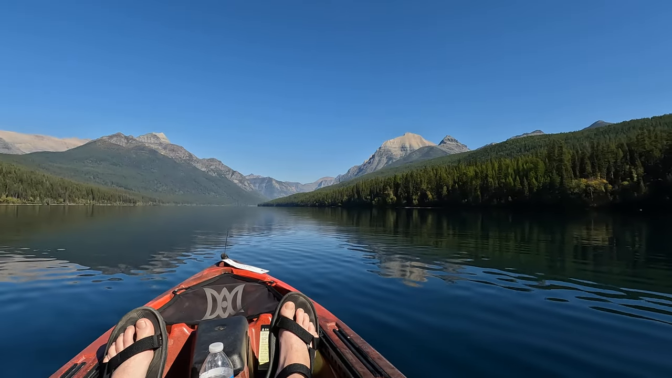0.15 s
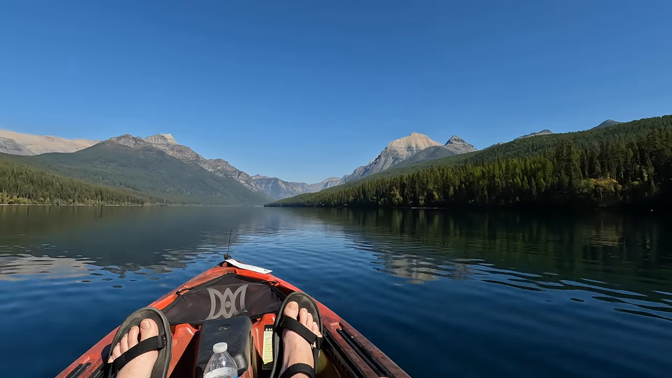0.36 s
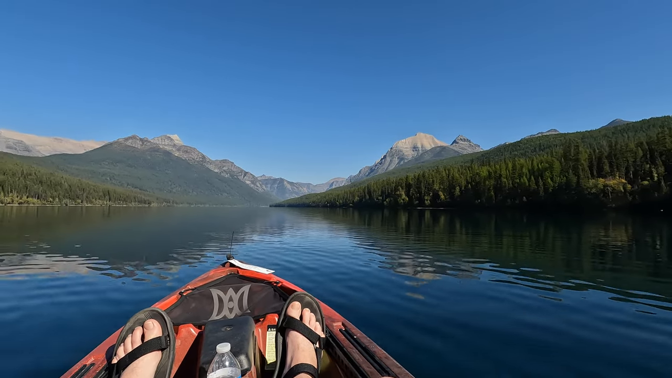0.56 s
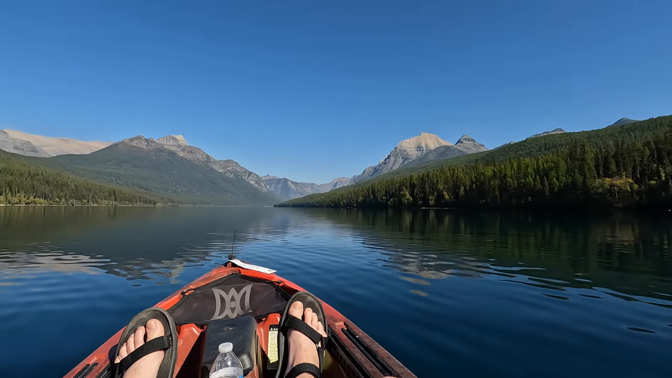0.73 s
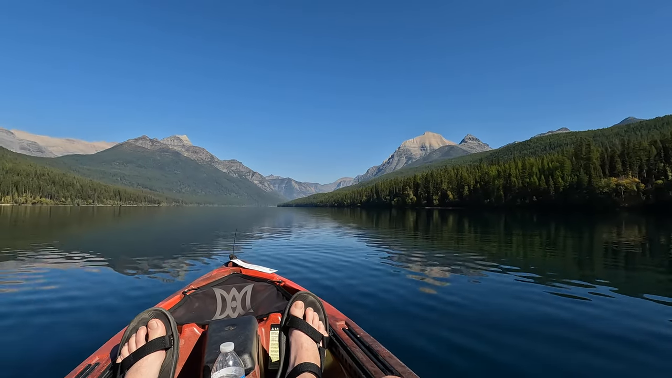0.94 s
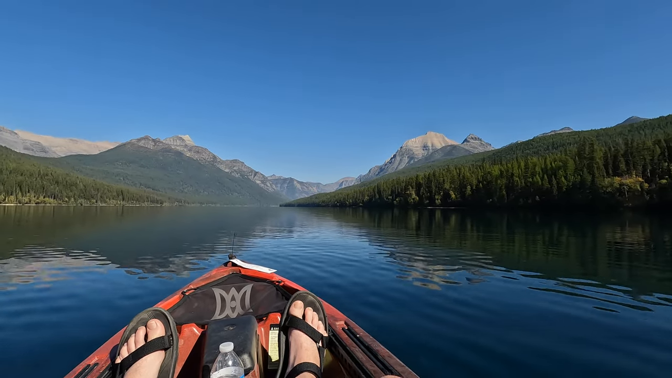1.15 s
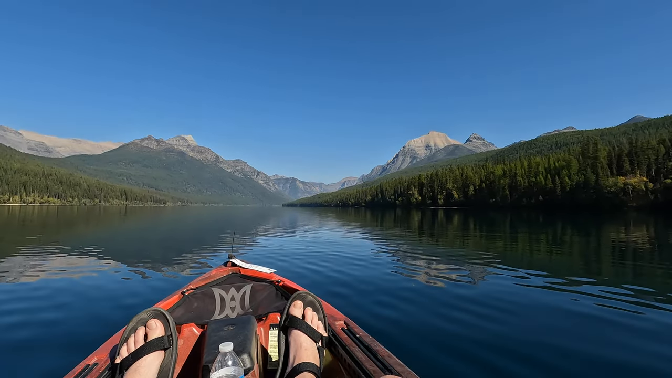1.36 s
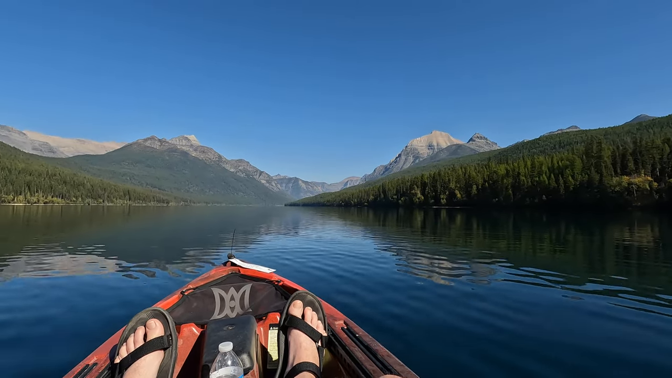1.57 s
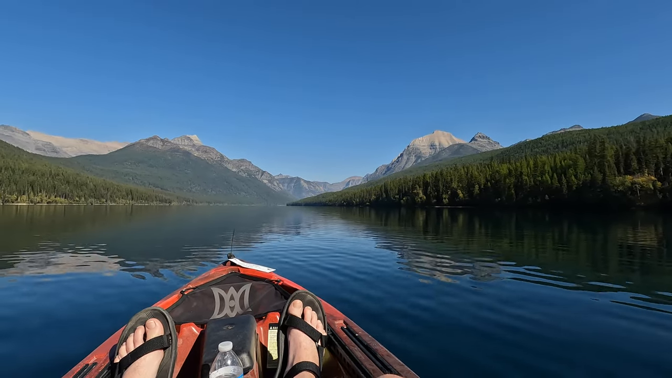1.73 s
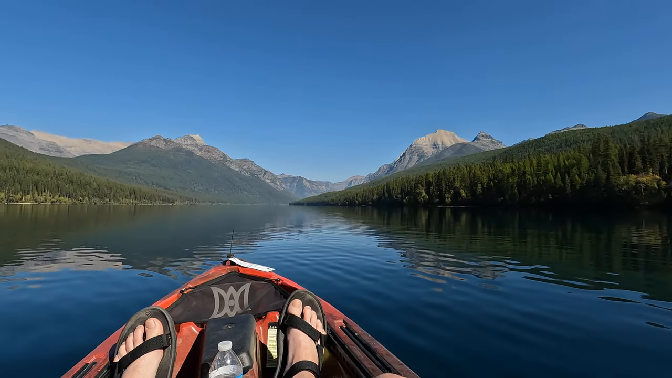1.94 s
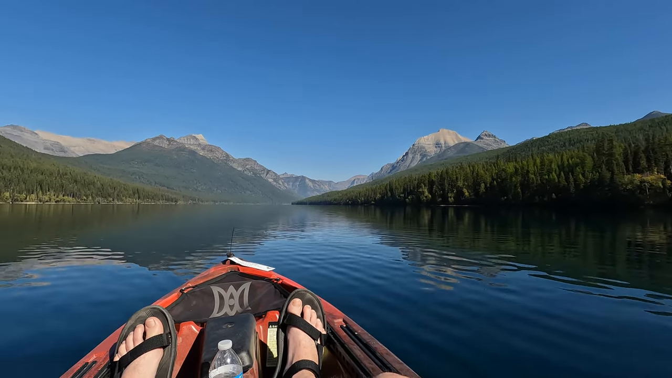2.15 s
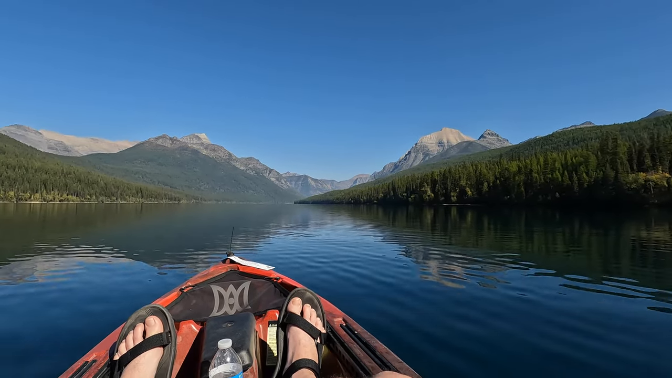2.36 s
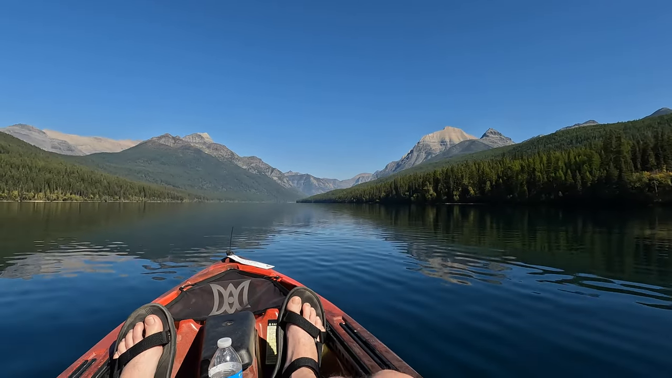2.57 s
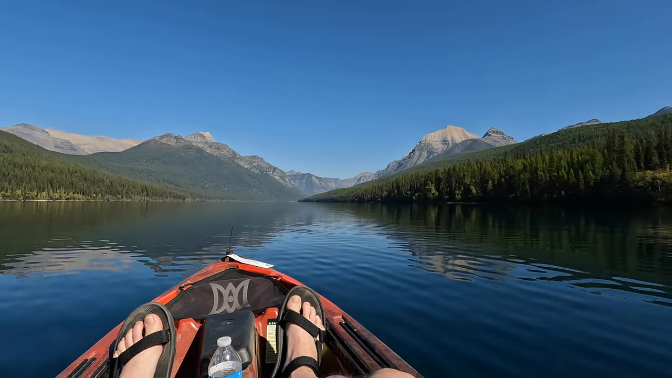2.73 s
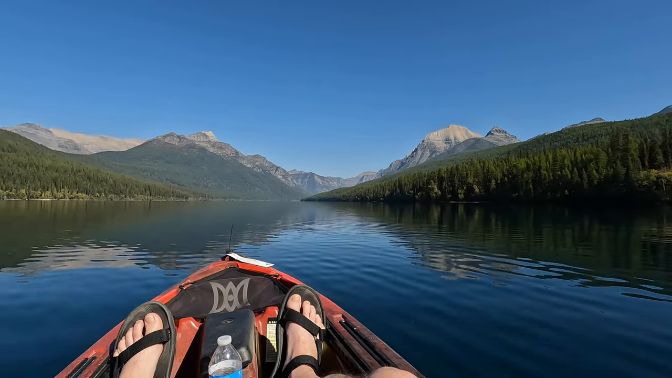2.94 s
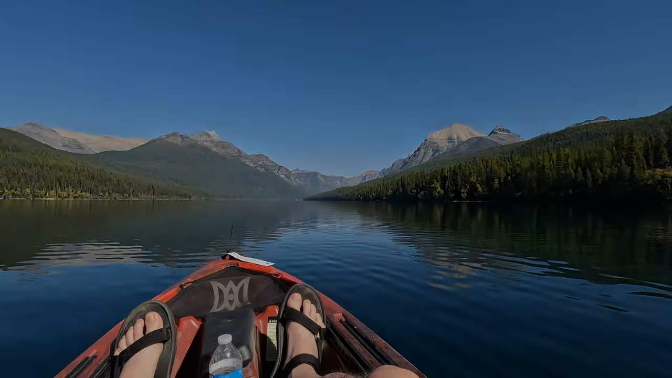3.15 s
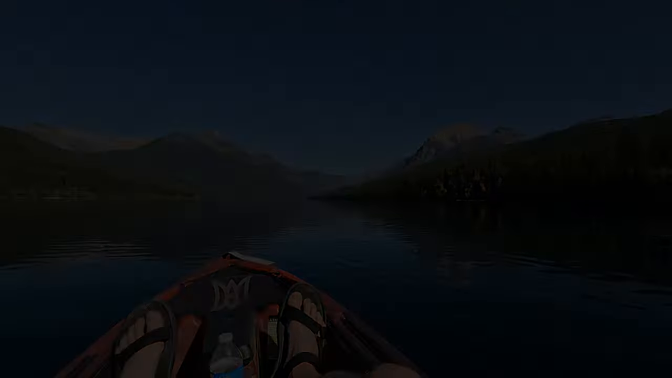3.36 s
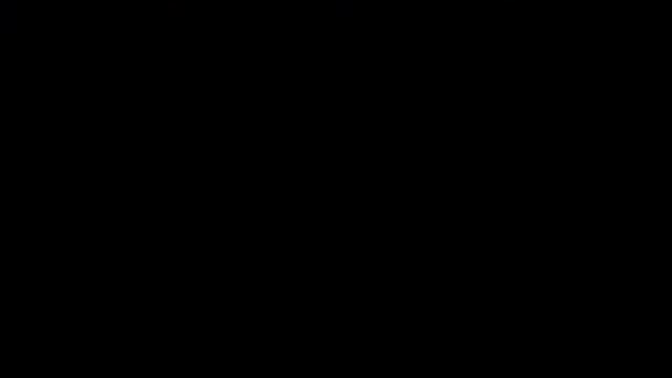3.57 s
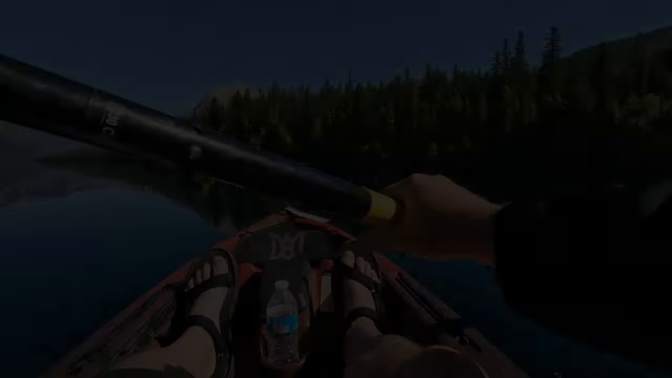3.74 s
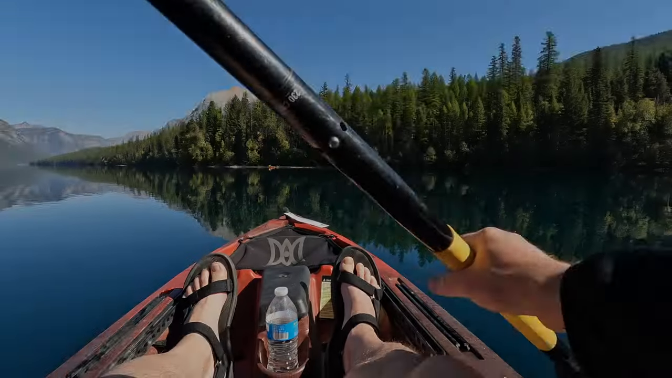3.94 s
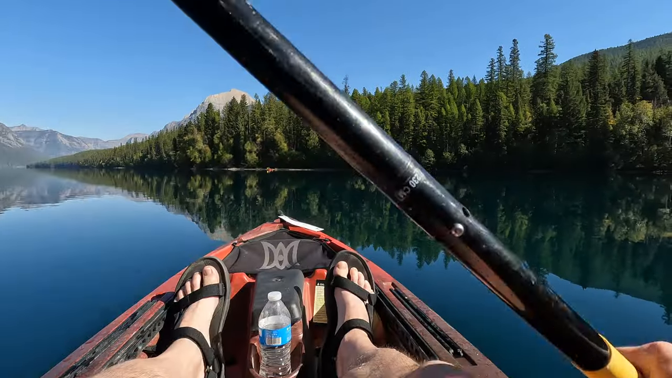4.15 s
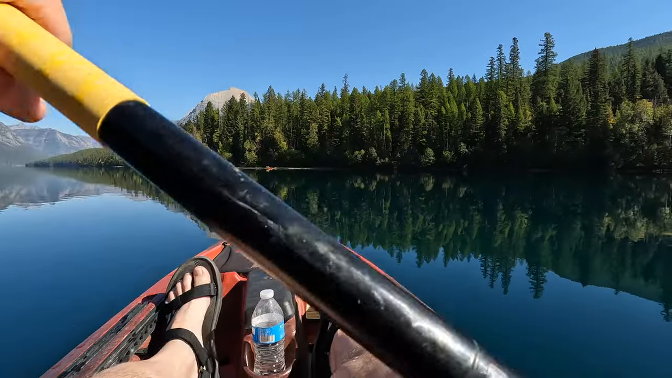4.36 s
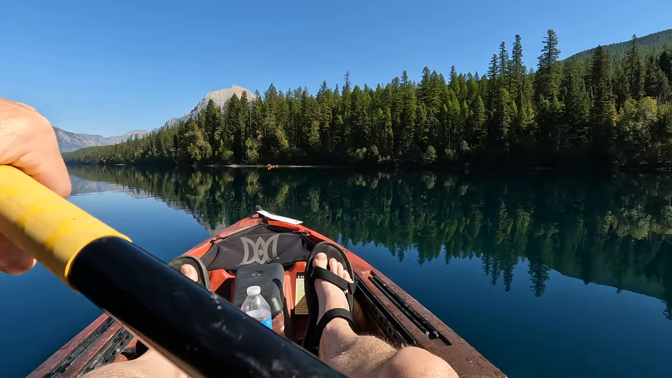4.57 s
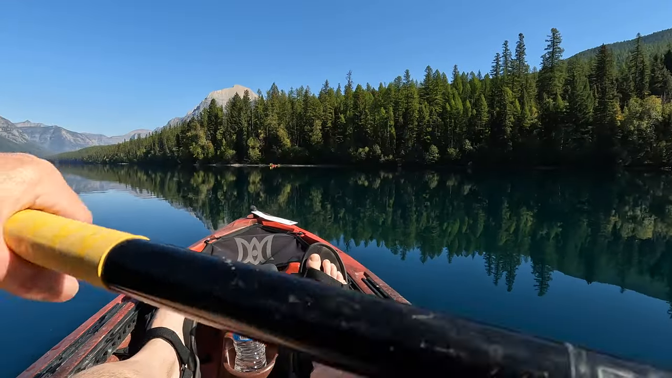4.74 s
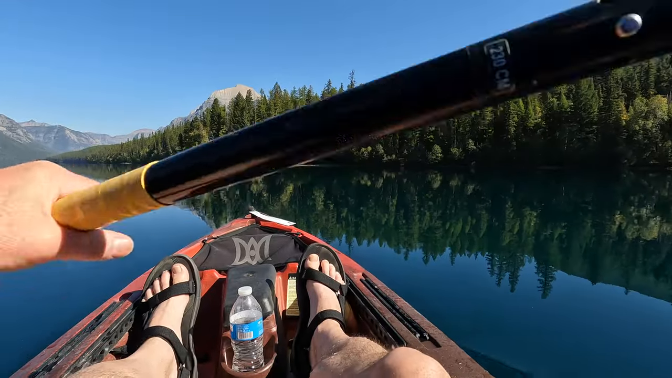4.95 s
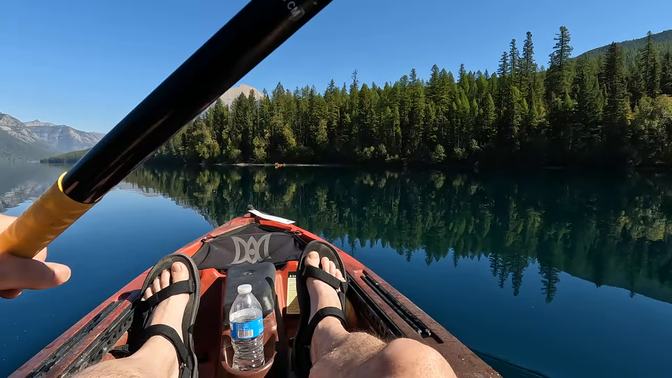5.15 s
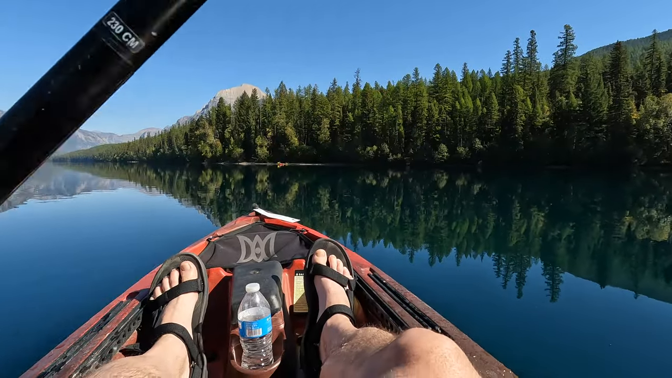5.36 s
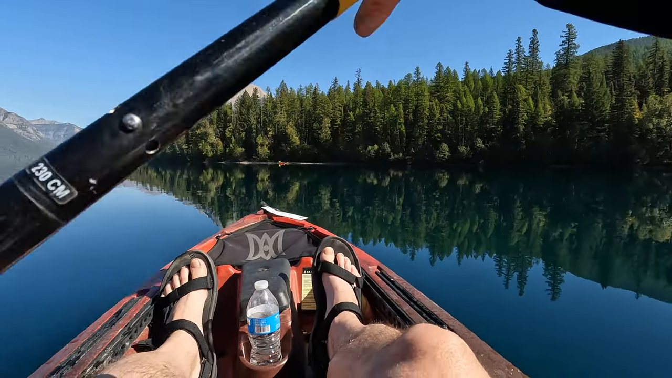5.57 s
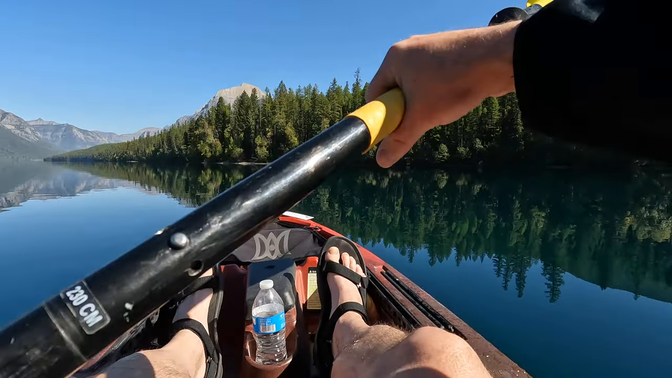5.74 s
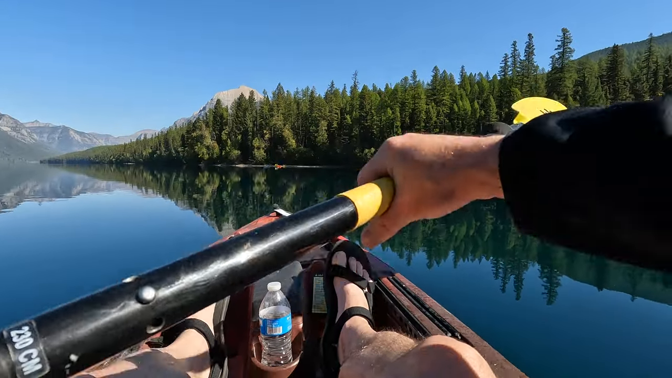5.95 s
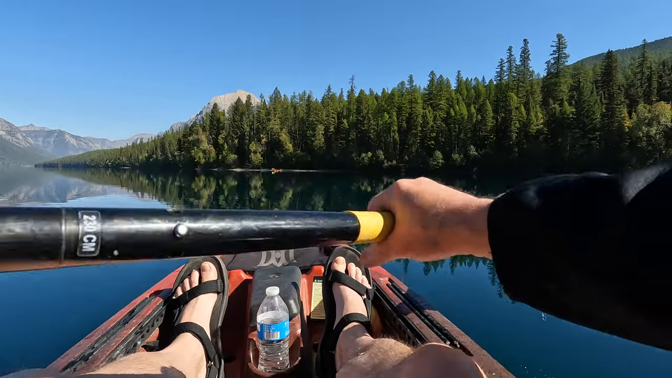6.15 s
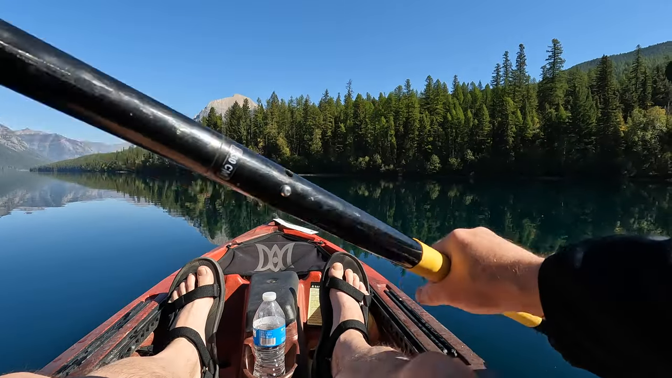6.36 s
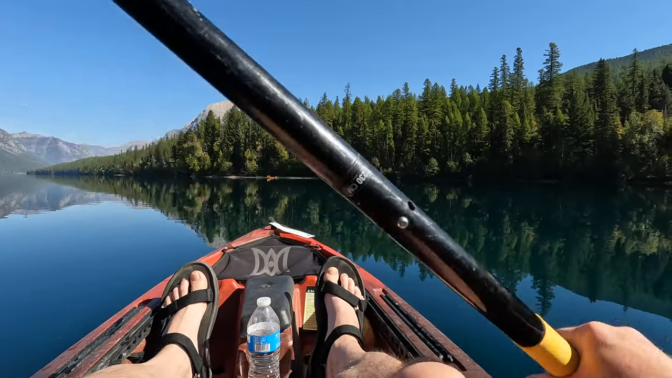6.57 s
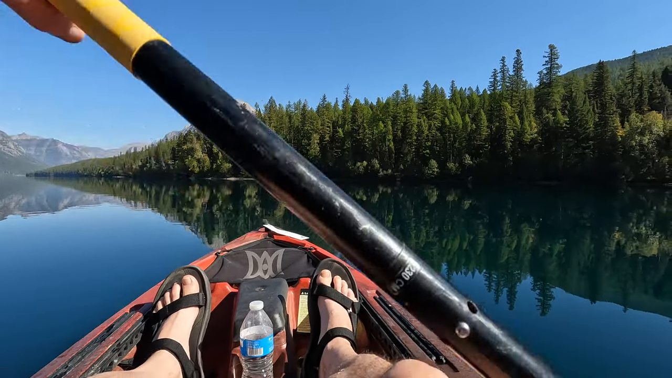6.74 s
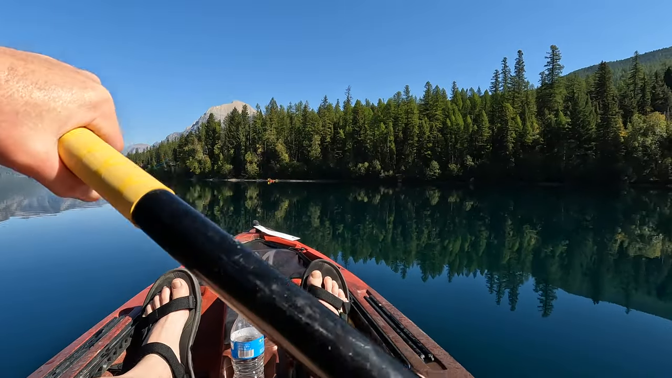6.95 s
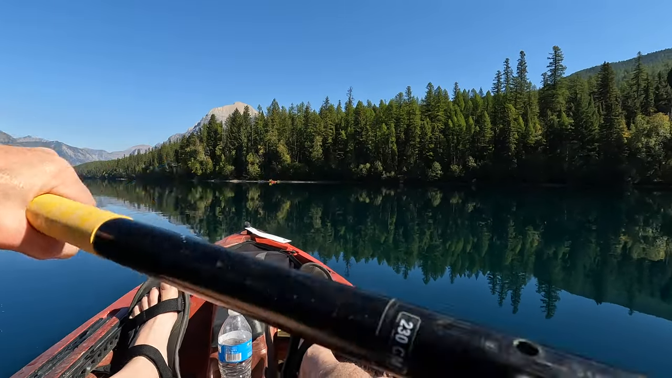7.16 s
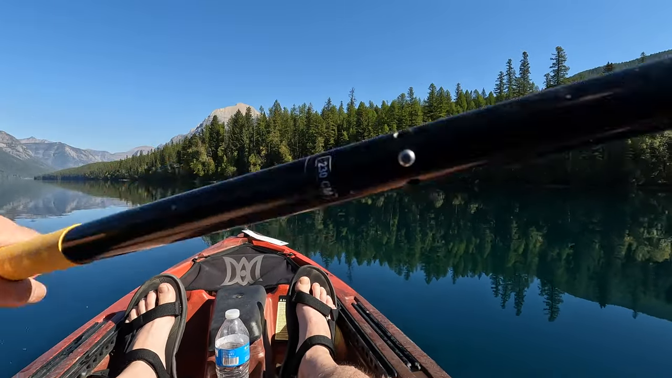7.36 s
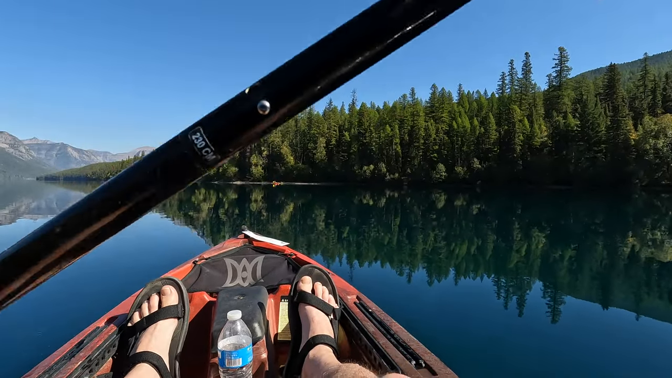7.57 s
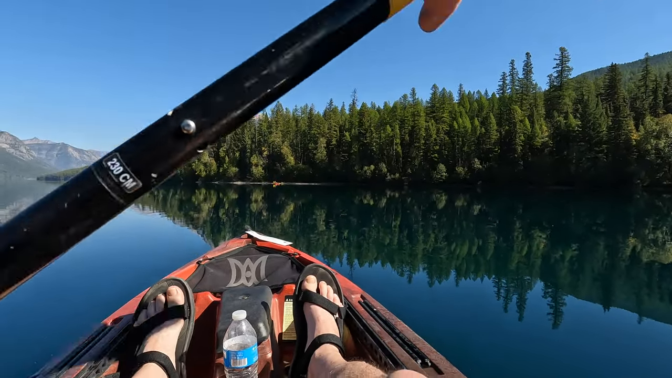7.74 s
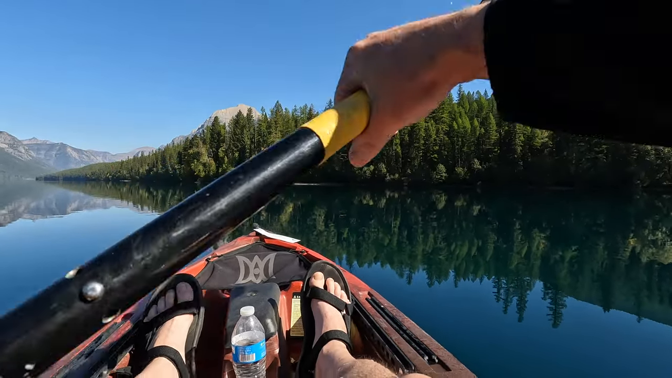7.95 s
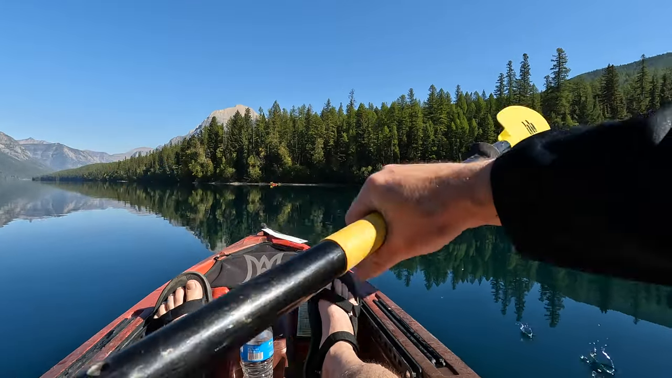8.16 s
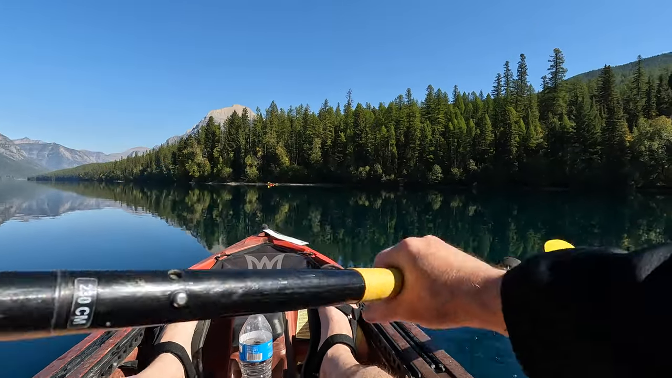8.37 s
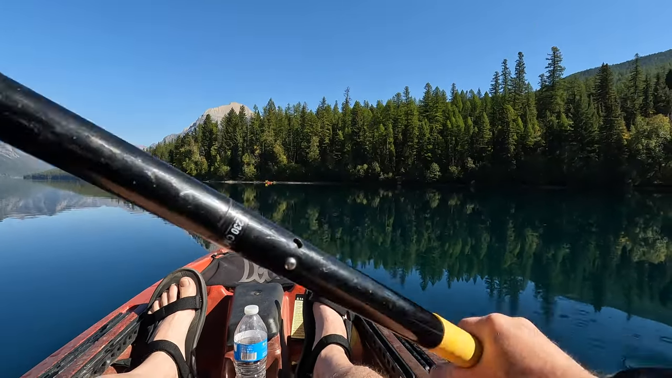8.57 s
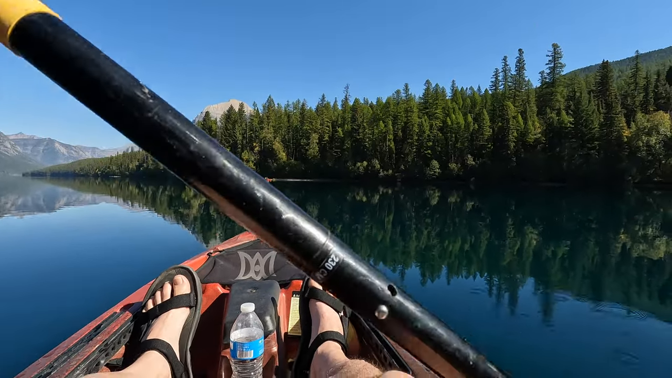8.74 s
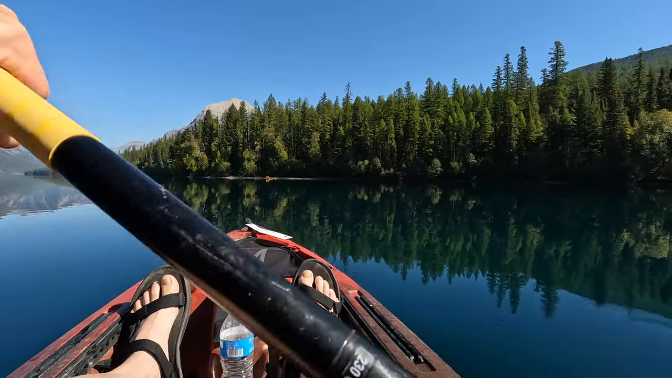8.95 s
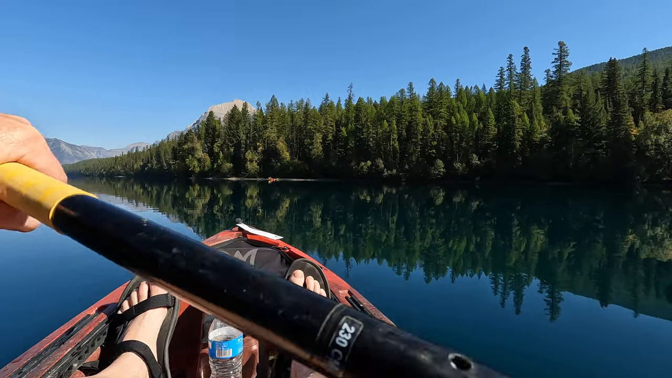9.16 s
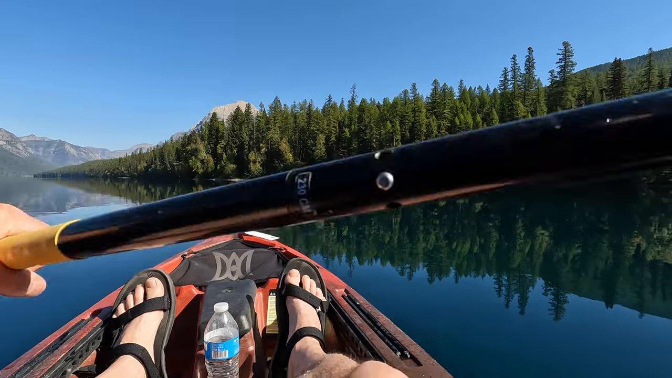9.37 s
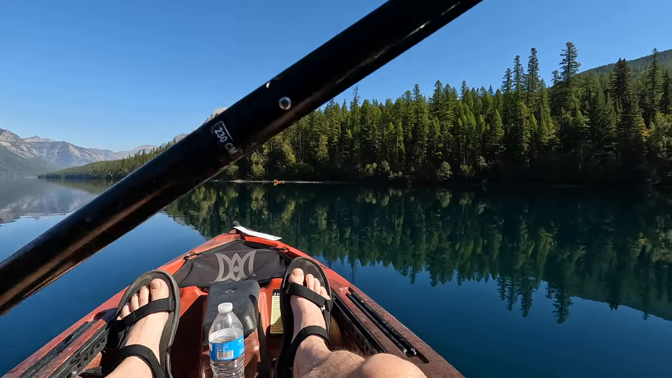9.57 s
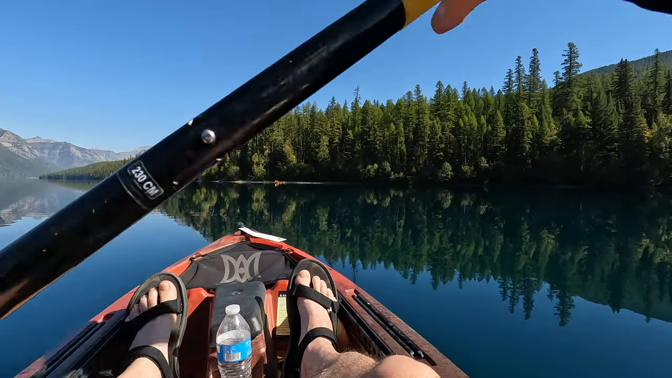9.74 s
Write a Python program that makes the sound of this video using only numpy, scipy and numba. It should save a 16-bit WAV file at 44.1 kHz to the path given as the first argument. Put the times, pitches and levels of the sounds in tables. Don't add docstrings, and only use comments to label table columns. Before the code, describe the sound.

Soft cloth rubbing and tiny creaks over a calm lake give way to rhythmic paddle strokes, deep bubbly gurgles, hull burble and spattering water.

```python
import sys
import numpy as np
from scipy import signal
from scipy.fft import rfft, irfft, next_fast_len
from scipy.io import wavfile
from scipy.ndimage import uniform_filter1d
from numba import njit

SR = 44100
rng = np.random.default_rng(int(sys.argv[2]) if len(sys.argv) > 2 else 0)


def transcribe(signal):
    frames = np.atleast_2d(signal).T
    limited = np.clip(frames, -1, 1)
    pcm = np.round(limited * 32767).astype(np.int16)
    wavfile.write(sys.argv[1], SR, pcm)


def how_loud(loudness_db):
    steps = np.asarray(loudness_db, float) / 20
    return 10 ** steps


N = 432621


def curve(table):
    s, db = np.transpose(table)
    return np.interp(np.arange(N) / SR, s, db, -120, -120)


def unit(x):
    return x / np.sqrt(np.mean(x ** 2))


def coloured(x, points):
    size = next_fast_len(N)
    hz = np.arange(size // 2 + 1) * SR / size + 1
    hz_at, db = np.transpose(points)
    gain = how_loud(np.interp(np.log(hz), np.log(hz_at), db))
    return unit(irfft(rfft(x, size) * gain, size)[:N])


def band(x, lo_hz, hi_hz):
    sos = signal.butter(2, [lo_hz, min(hi_hz, .45 * SR)], "band", fs=SR, output="sos")
    return unit(signal.sosfilt(sos, x))


def walk(rate):
    k = int(SR / rate)
    steps = np.repeat(rng.standard_normal(N // k + 1), k)
    return 1.25 * uniform_filter1d(uniform_filter1d(steps, k), k)[:N]


def swells(s, hold_s, rise_s, fall_s):
    t = np.arange(N) / SR
    return np.array([np.interp(t, [a - rise_s, a, a + h, a + h + fall_s], [0, 1, 1, 0])
                     for a, h in zip(s, hold_s)])


@njit
def ring(s, size, hz, cycles, glide, rise):
    out = np.zeros(N)
    for k in range(len(s)):
        start, tau, phase = int(s[k] * SR), cycles[k] * SR / hz[k] / 2, 0.
        for i in range(min(int(5 * tau), N - start)):
            u = i / tau
            phase += 2 * np.pi * hz[k] * (1 + glide[k] * u) / SR
            swell = (1 - np.exp(-u / rise)) * np.exp(-u * (1 + u) / 2)
            out[start + i] += size[k] * swell * np.sin(phase)
    return out


def swarm(count, lo_hz, hi_hz, cycles, glide, spread_db, pitch=np.ones(N)):
    when, big, high, long, climb = rng.random((count, 5)).T
    size = how_loud(np.minimum(-spread_db * np.log(1 - big), 14))
    hz = pitch[(when * N).astype(int)] * lo_hz * (hi_hz / lo_hz) ** high
    return unit(ring(when * N / SR, size, hz, cycles * (0.31 + 1.74 * long), glide * (climb - .2), 0.1))


def pockets(table, glide, rise, boost_db, after_db, after_s, count=5):
    s, db, hz, cycles = np.transpose(table)
    c = rng.random((len(s), 3 * count + 1)).T
    main = ring(s, how_loud(db + boost_db), hz, np.clip(cycles, 1, 30), glide * (0.4 + c[-1]), rise)
    wait, size, step = c[:-1].reshape(3, count, -1)
    trail_size = how_loud(db + after_db - 25 * wait - 9.1 * size)
    trail_hz = hz * 1.48 ** (step - .4)
    trail = (s + after_s * wait, trail_size, trail_hz, cycles + 0 * wait, glide * step)
    return main + ring(*(v.ravel() for v in trail), rise)


def bursts(table, ms, octaves, boost_db):
    out, u = np.zeros(N), np.arange(2600) / (SR * ms / 1000)
    for s, db, hz in table:
        start = int(s * SR)
        b, a = signal.iirpeak(hz, 1 / octaves, fs=SR)
        puff = signal.lfilter(b, a, signal.lfilter(b, a, rng.standard_normal(len(u))))
        puff = puff * u * np.exp(-u)
        out[start:start + len(u)] += (how_loud(db + boost_db) * puff / np.abs(puff).max())[:N - start]
    return out


# (time of full pull [s], hold [s], big bubbles over wake [dB], froth over wake [dB],
# pitch of the hollow behind the blade [Hz])
STROKES = [
    (3.582, 0.19, 7.5, 9, 300),
    (4.113, .02, 1, 1.5, 340),
    (4.665, 0.14, 12, 8.5, 283),
    (5.786, 0.33, 10, 11.5, 300),
    (6.812, 0.028, 5.5, 3, 263),
    (7.036, 0.28, 8.5, 13, 260),
    (7.767, 0.015, 9, 9, 206),
    (8.023, 0.28, 11, 11, 329),
    (9.09, 0.2, 7, 12, 270),
]
# (time [s], level [dB])
WAKE = [(3.17, -33), (3.33, -8.5), (3.46, -1.5), (3.58, -0.5), (3.98, 3), (4.3, 1), (5.0, 1.5), (5.2, -2),
        (5.5, 4), (5.68, 2), (6.3, -2), (6.6, -1), (7.6, 1), (7.92, -1.5), (8.7, 1), (9.42, 5.5), (9.6, 7),
        (9.76, 4.5)]


def paddling():
    catch_s, drain_s, froth_drain_s = 0.13, 0.163, 0.3
    wake_hz, climb_per_s = 300, 0.93
    s, hold_s, big_db, froth_db, hz = np.transpose(STROKES)
    t = np.arange(N) / SR
    pull = swells(s, hold_s, catch_s, drain_s)
    froth = swells(s, hold_s, catch_s, froth_drain_s)
    wake_db = np.interp(t, *np.transpose(WAKE), left=-70)
    last = np.maximum(np.searchsorted(s - catch_s, t) - 1, 0)
    hollow_hz = hz[last] * (1 + climb_per_s * (t - s[last]))
    stirred = np.minimum(pull.sum(axis=0), 1)
    gurgle_hz = wake_hz + stirred * (hollow_hz - wake_hz)
    return wake_db, big_db @ pull, froth_db @ froth, gurgle_hz


def gurgle(level_db, hollow_hz, surge):
    hollow = swarm(count=900, lo_hz=0.79, hi_hz=1.227, cycles=10.2, glide=0.3, spread_db=2.5,
                   pitch=np.maximum(hollow_hz, 150))
    mixed = swarm(count=900, lo_hz=157.8, hi_hz=600, cycles=7.05, glide=0.3, spread_db=2.5)
    wash = band(rng.standard_normal(N), 163, 568)
    return how_loud(level_db - 4.0 + 1.83 * surge) * (hollow + 1.26 * mixed + 1.22 * wash)


# (frequency [Hz], gain [dB])
HULL = [(500, -1.5), (750, -1), (950, 4), (1100, 0.5), (1350, 0), (2000, -1.5)]


def burble(level_db, surge):
    calm = np.clip((-41.0 - level_db) / 10, .25, 1.4)
    froth = swarm(count=6000, lo_hz=520, hi_hz=2300, cycles=9, glide=0.15, spread_db=2.2)
    froth += calm * band(rng.standard_normal(N), 510, 1350)
    return how_loud(level_db - 0.5 + 2.1 * surge) * coloured(froth, HULL)


# (frequency [Hz], level per Hz [dB])
SPRAY = [(880, -2.5), (1500, 2.5), (2280, -2.5), (3060, -2), (4180, -7), (7750, -13.5), (10400, -26),
         (13300, -32), (14200, -46), (15500, -56)]
# (time [s], hold [s], extra spray [dB])
SHOWERS = [
    (5.267, 0.032, 5.5),
    (7.763, 0.024, 3.5),
    (7.2, .15, 2),
    (9.12, .12, 2),
    (9.347, 0.27, 4.5),
]


def spray(level_db, surge):
    s, hold_s, db = np.transpose(SHOWERS)
    level_db = level_db + db @ swells(s, hold_s, 0.036, 0.054)
    fizz = swarm(count=12000, lo_hz=1882, hi_hz=14920, cycles=15.7, glide=0.23, spread_db=2.0)
    hiss = rng.standard_normal(N) * how_loud(2.6 * walk(30))
    whole = coloured(0.41 * fizz + hiss, SPRAY)
    body = coloured(whole, [(9000, -24), (11500, -24), (14000, -42)])
    sheen = coloured(whole, [(8000, -32), (10500, -21), (16000, 10)])
    opening_db = np.interp(np.arange(N) / SR, [3.4, 3.9, 4.08], [-38, -20, 1])
    drops = swarm(count=260, lo_hz=4170, hi_hz=12900, cycles=12, glide=0.053, spread_db=4)
    fine = how_loud(0.27 * level_db - 55.5 + opening_db) * (sheen + 0.6 * drops)
    return how_loud(level_db + 1.45 + 0.53 * surge) * body + fine


# (time [s], peak level [dB], pitch [Hz], length [cycles])
GULPS = [(3.488, -34, 463, 11), (3.523, -35.5, 365, 13), (3.614, -33, 389, 10), (3.701, -35, 189, 10.5),
         (4.115, -27, 362, 6.2), (4.512, -26.5, 250, 7.1), (4.117, -32.5, 169, 3.9), (3.88, -27.5, 420, 13),
         (5.783, -29.5, 246, 9), (5.887, -26.5, 431, 18), (7.033, -21.5, 340, 4.2), (6.046, -23, 435, 15),
         (6.283, -37, 395, 20), (7.015, -22, 247, 9.4), (7.152, -31.5, 201, 10.6), (7.23, -33, 440, 19),
         (7.313, -28.5, 422, 17), (7.772, -31.5, 198, 8), (7.852, -32, 216, 5.3), (7.975, -28.5, 347, 9.9),
         (8.028, -31.5, 412, 14.5), (8.112, -23.5, 368, 7.7), (8.211, -20.5, 300, 4.7),
         (8.753, -33.5, 417, 6.7), (8.964, -23.5, 433, 3.5), (9.062, -20.5, 546, 19),
         (9.093, -21.5, 217, 3), (9.141, -27.5, 213, 7.9), (9.32, -18, 380.5, 10.1), (9.441, -34, 360, 7)]
# (time [s], peak level [dB], pitch [Hz], length [cycles])
PLOPS = [(3.525, -30, 875, 7.8), (3.638, -18, 946, 7.2), (3.858, -20.5, 730, 12.6),
         (3.926, -28.5, 834, 11.4), (4.857, -32, 880, 16), (4.88, -32, 900, 25), (5.232, -31, 766, 18),
         (5.9, -23.5, 890, 6.2), (6.251, -29, 810, 9.3), (6.898, -25.5, 678, 1.3), (7.07, -29, 1020, 10),
         (7.249, -20.5, 760, 11), (7.454, -31, 587, 6.2), (7.586, -36.5, 746, 42), (7.703, -34.5, 890, 13),
         (7.79, -23, 880, 5.8), (8.212, -17.5, 680, 3.8), (8.571, -32, 814, 16), (9.057, -22.5, 660, 6.9),
         (9.316, -26, 785, 8), (9.441, -25.5, 580, 12),
         (4.312, -32.5, 1310, 17), (4.476, -31, 1210, 14), (4.65, -22, 1250, 12), (7.002, -24, 1260, 9.5),
          (7.047, -24, 1280, 8.6), (7.5, -32, 1000, 13), (8.862, -31.5, 990, 13.4),
          (8.935, -24.5, 1160, 2.8), (8.967, -30, 1240, 10), (8.996, -32, 1460, 16), (9.065, -6, 1050, 2.8),
          (9.126, -27, 1205, 16)]
# (time [s],
# peak level [dB], pitch [Hz], length [cycles], pitch climb [share])
CAVITIES = [(.595, -52.5, 520, 15, -0.074), (1.019, -56, 770, 10, -0.31), (4.32, -36, 520, 22, 0.14),
            (4.504, -24, 445, 12, 0.05), (4.53, -31, 256, 21, -0.022), (4.515, -32, 140, 11, 0.029),
            (4.812, -25.5, 250, 24, 0.3), (4.785, -29.5, 420, 29.5, .1), (4.592, -31.5, 800, 40.7, .25),
            (7.409, -24, 790, 27, 0.19), (7.425, -38, 2000, 30, 0.087), (7.9, -29.5, 300, 14.3, 0.395),
            (7.295, -29, 450, 20, -0.054), (7.39, -30.5, 400, 26, -.1), (7.78, -29.5, 195, 10.7, 0.036),
            (5.94, -30.5, 950, 20, 0.14), (8.0, -31, 400, 39, .05), (8.26, -30, 330, 30, .05),
            (8.38, -35.5, 270, 37, -.05), (4.69, -31, 262, 14, 0.09), (4.745, -28, 426, 11, .05),
            (9.15, -28.5, 450, 33, -0.07), (7.35, -39, 470, 56.6, -0.25), (7.979, -35.5, 164.5, 37, -0.032),
            (8.225, -28, 231, 16.5, 0.02), (9.216, -23, 249.5, 17.3, 0.356), (9.338, -17, 390, 6.8, 0.16),
            (9.038, -13.5, 24.3, 1.55, 0.14)]
# (time [s], peak level [dB], pitch [Hz], length [cycles])
BEADS = [(3.707, -32, 1060, 8.3), (3.833, -36, 810, 9), (3.899, -27, 764, 9), (4.436, -31.5, 630, 8.3),
         (4.679, -29, 910, 9), (4.737, -30, 1170, 9), (4.796, -34, 694, 9), (4.874, -27, 802, 9),
         (5.832, -29.5, 573, 9), (5.851, -29, 697, 9), (5.995, -31, 902, 9), (6.026, -31, 552, 9),
         (6.074, -31, 985, 9), (6.108, -28, 918, 9), (6.121, -27, 1160, 10), (6.144, -30, 947, 9),
         (6.212, -33, 740, 9.8), (6.287, -29, 890, 9), (6.299, -31, 715, 9), (6.555, -33.5, 1000, 9),
         (7.118, -27, 1030, 9), (7.189, -31, 988, 9), (7.269, -27, 851, 9), (7.299, -26, 622, 9),
         (7.349, -30, 947, 9), (7.384, -33, 802, 9), (7.749, -33, 877, 9), (7.775, -25.5, 764, 9),
         (8.028, -27.5, 554, 9), (8.129, -34, 1040, 9), (8.249, -31, 956, 9.8), (8.289, -39, 961, 8.2),
         (8.636, -35, 780, 9), (9.084, -16, 608, 7.8), (9.179, -26, 1230, 9), (9.203, -26, 920, 10),
         (9.267, -25.5, 1750, 9), (9.297, -26, 552, 9), (9.495, -27, 748, 9), (9.522, -26, 610, 9),
         (9.568, -28, 886, 9), (9.642, -29, 1730, 9.9), (9.734, -36, 552, 9)]


def single_bubbles():
    out = pockets(GULPS, glide=0.12, rise=0.094, boost_db=2.3, after_db=-5.5, after_s=.07)
    out += pockets(PLOPS, glide=0.035, rise=0.062, boost_db=0.41, after_db=-3, after_s=.05)
    s, db, hz, cycles, climb = np.transpose(CAVITIES)
    out += ring(s, how_loud(db + 1.5), hz, cycles, climb, 0.26)
    s, db, hz, cycles = np.transpose(BEADS)
    return out + ring(s, how_loud(db - 1.5), hz, cycles, 0.047 + 0 * s, 0.11)


# (time [s], peak level [dB], pitch [Hz])
SPATTER = [(5.289, -31, 2780), (5.29, -41, 9000), (6.43, -54, 11000), (7.402, -46, 8150),
           (7.463, -57, 6500), (7.655, -45, 6800), (7.773, -35.5, 3160), (7.776, -38.5, 7100),
           (8.228, -40.5, 11000), (8.37, -43.5, 10500), (8.752, -30, 2930), (9.05, -41, 3700),
           (9.422, -32, 4240), (9.79, -31.5, 4740),
           (3.6795, -44.5, 5660), (3.7444, -52, 4090), (3.7944, -45, 4670), (3.8467, -41.5, 5350),
         (3.9194, -50, 4840), (4.0123, -42, 4050), (6.5084, -53, 4970), (7.4909, -45, 4730),
         (8.4964, -47, 4000), (8.6994, -49, 6600), (9.3696, -36.5, 5500), (9.4489, -36, 4100),
         (9.6734, -37, 4900), (9.7174, -50, 5800), (9.7464, -49, 4720)]
# (time [s], peak level [dB], pitch [Hz])
SLAPS = [(2.152, -51, 950), (2.157, -47, 3100), (4.434, -35.5, 895), (7.024, -26.5, 2430),
         (7.047, -29.5, 2190), (9.05, -19.5, 1100), (9.064, -28, 1340), (9.797, -28.5, 420),
         (9.795, -30, 150), (8.029, -32, 1500), (9.441, -27, 800), (9.063, -21, 1400), (7.973, -38, 2600),
         (1.02, -52, 5000), (1.035, -54, 3600), (.585, -52, 5500), (8.755, -33, 1200), (4.797, -35, 2300),
         (5.832, -33, 1800)]


def splashes():
    drops = bursts(SPATTER, ms=1.45, octaves=0.76, boost_db=-0.53)
    return drops + bursts(SLAPS, ms=3.26, octaves=0.84, boost_db=-1.0)


def water(wake_db, big_db, froth_db, gurgle_hz):
    surge = walk(20)
    spray_lag = int(0.016 * SR)
    spray_db = -57.5 + 1.1 * wake_db + 0.34 * np.roll(froth_db, spray_lag)
    beds = gurgle(-52.5 + wake_db + big_db, gurgle_hz, surge)
    beds += burble(-51.5 + wake_db + froth_db, surge)
    beds += spray(spray_db, surge)
    return beds + single_bubbles() + splashes()


# (time [s], level [dB])
CLOTH = [(0.0, -78.5), (0.15, -85), (0.3, -76), (0.45, -71), (0.7, -69.5), (0.88, -66.5), (1.0, -71.5),
         (1.25, -73), (1.4, -92)]
# (time [s], hold [s], extra crinkle [dB])
FLURRIES = [
    (.05, 0.052, 5.5),
    (0.261, 0.035, 7),
    (0.48, 0.15, 3),
    (0.686, 0.022, 1.5),
    (0.85, 0.059, 4),
    (1.008, 0.028, 8.5),
]
# (time [s], peak level [dB], pitch [Hz])
CREAKS = [(0.058, -56.5, 2000), (0.267, -58, 1360), (0.371, -51, 960), (0.434, -44, 1370),
          (0.531, -60, 1720), (0.582, -43.5, 1510), (0.704, -52, 1280), (0.744, -50.5, 1240),
          (0.774, -48, 1180), (0.826, -38, 1530), (0.859, -41.5, 1700), (0.878, -41.5, 1070),
          (0.917, -43.5, 1160), (.41, -50, 1100), (.455, -49, 1100), (.635, -52, 1300), (.955, -50, 1400),
          (1.04, -52, 1300), (1.104, -58, 1270), (3.264, -48, 1600)]
# (time [s], peak level [dB], pitch [Hz])
TICKS = [(.007, -37, 6500), (0.0628, -53, 6330), (0.178, -57, 6860), (.288, -54, 7500), (.337, -56, 5500),
         (0.5107, -49, 5840), (0.8006, -49, 6900), (0.834, -50, 4930), (0.9053, -46, 6700),
         (0.937, -44, 5900), (1.0765, -49, 6600), (1.0969, -46.5, 7200), (1.427, -60, 4140),
         (1.5294, -49, 5700), (1.6382, -59, 5710), (2.0123, -58, 7300), (2.287, -55.5, 7850),
         (0.1132, -53, 7050), (0.2339, -62, 8660), (0.2549, -54, 3820), (0.279, -51, 3660),
         (0.3023, -53, 3600), (0.3681, -51.5, 5270), (0.4185, -58, 2590), (0.4395, -57, 3560),
         (0.4599, -58, 4950), (0.4799, -53, 4410), (0.5412, -54, 6890), (0.5632, -51, 6380),
         (0.5806, -48, 5020), (0.5944, -52, 4920), (0.6729, -59, 4020), (0.6869, -54, 7260),
         (0.7393, -58, 6850), (0.7767, -54, 5480), (0.7827, -51, 7240), (0.86, -51, 5530),
         (0.8794, -53, 5740), (1.0221, -49, 5240), (1.0394, -56, 3840), (1.3887, -62, 6750),
         (1.5958, -67, 4220), (1.741, -66, 7110), (1.8128, -66, 6870), (1.8772, -62, 7760),
         (2.4339, -69, 2780), (2.6629, -70, 7560), (2.7073, -70, 2650), (2.7447, -66, 4710)]


def cloth():
    rub_db = curve(CLOTH)
    s, hold_s, db = np.transpose(FLURRIES)
    crinkle_db = np.minimum(-71.5 + 0.58 * (rub_db + 65.5), rub_db + 7)
    rub = swarm(count=5000, lo_hz=874, hi_hz=2145, cycles=10.3, glide=0.16, spread_db=2.0)
    rub += 0.49 * swarm(count=900, lo_hz=300, hi_hz=746, cycles=5.1, glide=-0.069, spread_db=3)
    crinkle = swarm(count=7000, lo_hz=3080, hi_hz=9000, cycles=8, glide=0.027, spread_db=3.0)
    crinkle += 0.4 * band(rng.standard_normal(N), 2600, 7800)
    crinkle = crinkle * how_loud(1.0 * walk(68.3) + db @ swells(s, hold_s, 0.009, 0.013))
    creaks = bursts(CREAKS, ms=5.0, octaves=0.29, boost_db=-0.37)
    ticks = bursts(TICKS, ms=0.95, octaves=0.36, boost_db=-0.1)
    return how_loud(rub_db + 3.5) * rub + how_loud(crinkle_db + 2.5) * crinkle + creaks + ticks


# (time [s], level [dB])
BREEZE = [(0.0, -57), (0.12, -74), (0.19, -49), (0.3, -73), (0.72, -65), (0.85, -48.5), (1.17, -39),
          (1.45, -50), (1.9, -44), (2.15, -53), (3.15, -49.5), (4.75, -47), (5.0, -57), (5.7, -49),
          (5.85, -39.5), (6.5, -55.5), (7.6, -43), (9.81, -41.5)]
# (time [s], hold [s], level [dB])
GUSTS = [(1.125, 0.22, -56.5), (3.616, 0.029, -55), (4.112, 0.031, -56), (4.605, 0.176, -63),
         (5.8, 0.28, -46), (5.3, .1, -59), (6.202, .08, -53.5), (6.7, 0.18, -60), (7.107, 0.08, -62),
         (7.538, 0.25, -54.5), (8.392, 0.17, -66), (9.007, 0.24, -45)]


def breeze(wake_db):
    still_db, moving_db = -85.5, -57.5
    s, hold_s, db = np.transpose(GUSTS)
    gusts = how_loud(still_db) + how_loud(moving_db + wake_db)
    gusts = gusts + how_loud(db) @ swells(s, hold_s, rise_s=0.071, fall_s=0.033) ** 2
    rumble = coloured(rng.standard_normal(N),
                      [(6, -38), (14, 11.5), (28, 2.0), (45, -12.5), (70, -33), (140, -64.5)])
    buffet = coloured(rng.standard_normal(N),
                      [(25, -22), (50, 3.5), (80, -3.5), (120, -4), (250, -20.5), (420, -47)])
    return how_loud(curve(BREEZE)) * rumble + gusts * buffet * how_loud(3.1 * walk(14))


# (frequency [Hz], level per Hz [dB])
LAKE = [(53, -42), (90, -19), (177, 1), (282, -7.5), (698, -16.5), (1110, -16.5), (3190, -28), (6300, -30),
        (7300, -21), (8500, -29), (14000, -90)]


def lake():
    return how_loud(-74 + 0.5 * walk(6.4)) * coloured(rng.standard_normal(N), LAKE)


def scene():
    wake_db, *strokes = paddling()
    return np.tile(water(wake_db, *strokes) + cloth() + breeze(wake_db) + lake(), (2, 1))


# (time [s], top frequency [kHz])
TOP_KHZ = [(3.15, 13.6), (3.22, 11.5), (3.45, 13.2), (4.0, 14.1), (4.04, 20)]


def limit_treble(mid):
    mid = signal.sosfilt(signal.butter(6, 14300, fs=SR, output="sos"), mid)
    hz, s, z = signal.stft(mid, SR, nperseg=1024)
    over_khz = hz[:, None] / 1000 - np.interp(s, *np.transpose(TOP_KHZ))
    return hz, s, z * how_loud(-45 * np.clip(over_khz, 0, 1))


# (frequency [Hz], sound leaning left [share], unrelated between ports [share])
PORTS = [(40, -0.25, 0.23), (150, -0.034, 0.028), (400, 0, 0.16), (1000, 0.11, 0.32), (4040, 0.1, 0.57),
         (8000, 0.27, 0.58), (13000, 0.81, 0.66)]
# (time [s], width [0-1], always stereo above [kHz])
OPEN = [(3.2, 1, 11), (3.45, .3, 14), (3.92, .3, 13), (4, .72, 11), (4.05, 0, 11), (5.73, 0, 11),
        (5.76, .4, 10.5), (6.2, .52, 9), (7, .7, 6.5), (7.55, .72, 6.5), (7.7, 1, 5)]
RANGES_HZ = [120, 350, 1600]
THRESHOLDS = [(.02, .33), (.22, .66), (.28, .8), (.45, 1)]


def port_difference(hz, s, z):
    hz_at, lean, unrelated = np.transpose(PORTS)
    turn = np.exp(2j * np.pi * rng.random(z.shape))
    drifting = 0.57 * np.outer(hz > 110, s < 3.2)
    loose = np.interp(hz, hz_at, unrelated)[:, None] + drifting
    side = z * (np.interp(hz, hz_at, lean)[:, None] + loose * turn)
    times, width, top_khz = np.transpose(OPEN)
    first, full = np.transpose(THRESHOLDS)[:, np.searchsorted(RANGES_HZ, hz), None]
    chance = (np.interp(s, times, width) - first) / (full - first)
    third = (3 * np.log2(hz / 20 + 1)).astype(int)
    patch = rng.random((40, len(s) // 4 + 1))[third][:, np.arange(len(s)) // 4]
    keep = (patch < chance) | (hz[:, None] > 1000 * np.interp(s, times, top_khz))
    return side * keep


def low_pass(x):
    return signal.sosfilt(signal.butter(12, 15700, fs=SR, output="sos"), x)


def record(dry):
    hz, s, z = limit_treble(dry.mean(axis=0))
    mid = signal.istft(z, SR, nperseg=1024)[1][:N]
    side = signal.istft(port_difference(hz, s, z), SR, nperseg=1024)[1][:N]
    return low_pass(np.array([mid + side, mid - side]))


dry = scene()
out = record(dry)
transcribe(out)
```